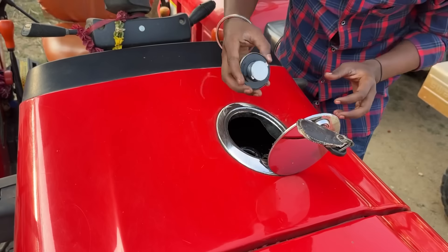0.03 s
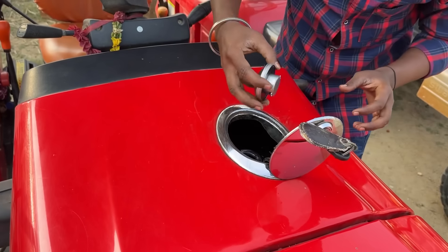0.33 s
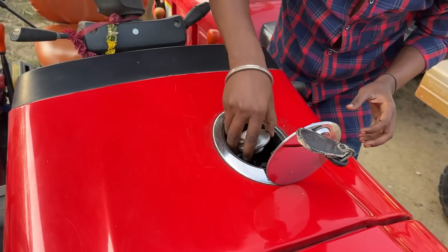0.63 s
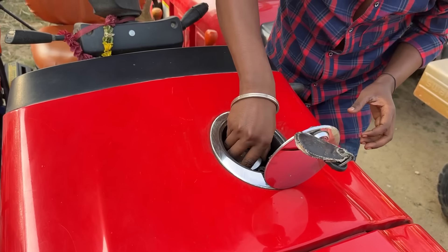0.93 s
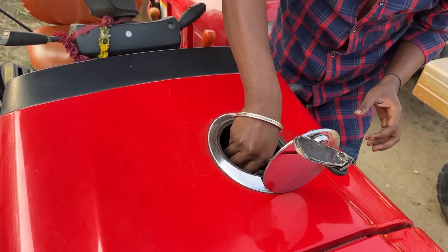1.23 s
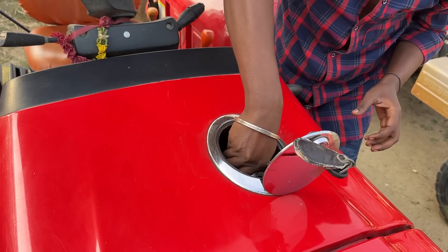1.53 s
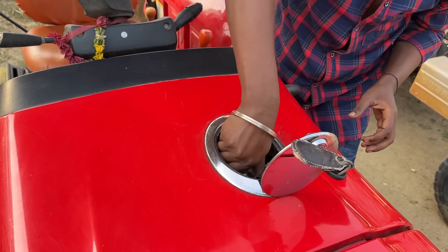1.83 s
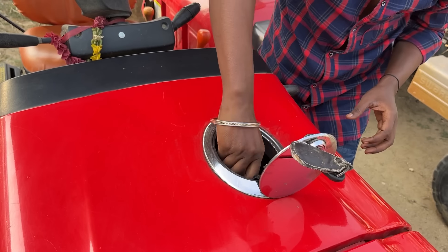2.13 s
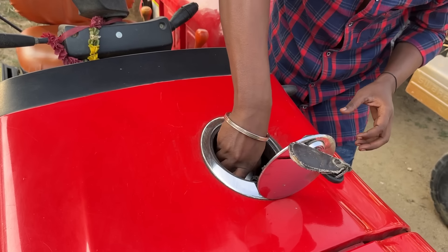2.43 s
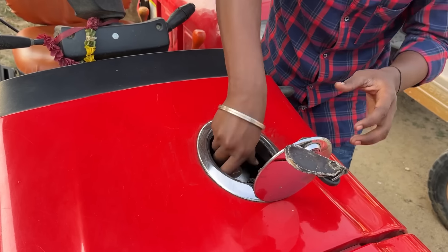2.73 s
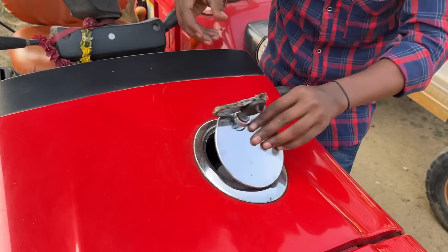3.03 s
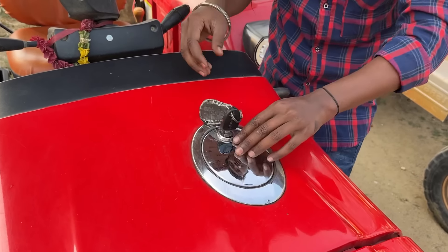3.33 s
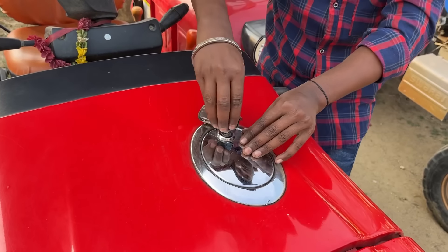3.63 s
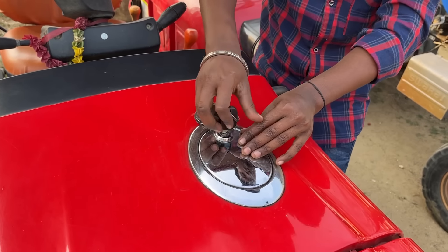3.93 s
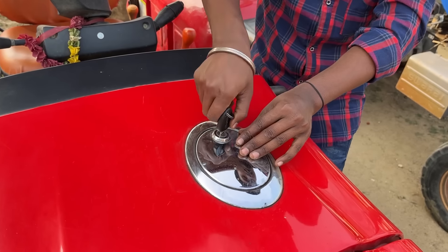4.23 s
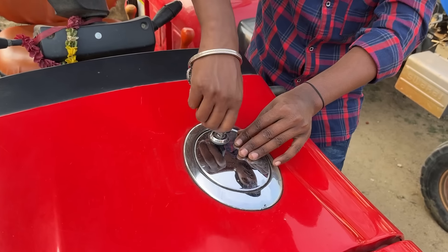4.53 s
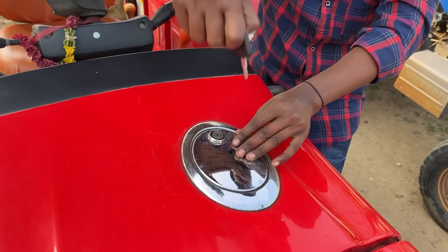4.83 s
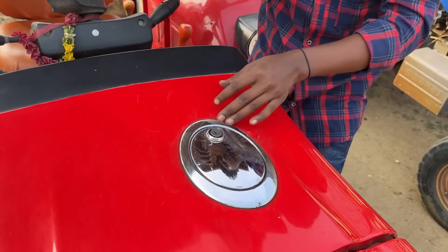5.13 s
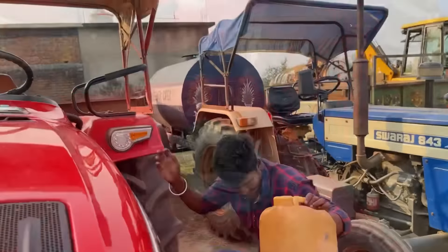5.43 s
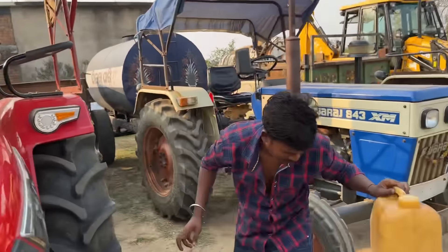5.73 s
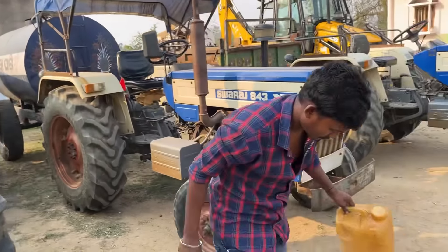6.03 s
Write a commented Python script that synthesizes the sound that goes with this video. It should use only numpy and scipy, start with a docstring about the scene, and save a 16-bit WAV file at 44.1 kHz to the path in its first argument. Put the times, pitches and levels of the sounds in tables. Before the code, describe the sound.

A metal fuel cap knocks and screws into a ringing tank, then a flap slams and a key grates in its lock, with faint birds.

```python
"""A metal fuel cap is knocked into a tractor's filler neck and screwed down, ringing the steel tank.
The chrome flap slams on the sheet-metal bonnet and a key grates in its lock. Shoes scuff on dirt
and a plastic jerrycan clicks as it is carried off. Small birds whistle in the yard, and parked
vehicles return a faint echo over a low rumble."""
import sys
import numpy as np
from scipy import signal
from scipy.fft import rfft, irfft, next_fast_len
from scipy.io import wavfile
from scipy.ndimage import uniform_filter1d

SR = 44100
rng = np.random.default_rng(int(sys.argv[2]) if len(sys.argv) > 2 else 0)


def inscribe(sig):
    """Save sig as 16-bit PCM at rate SR to the path in sys.argv[1].

    A 1-D sig is mono; a 2-D sig holds one channel per row.
    Samples are clipped to [-1, 1] before scaling.
    """
    pcm = np.round(np.clip(np.atleast_2d(sig).T, -1, 1) * 32767)
    wavfile.write(sys.argv[1], SR, pcm.astype(np.int16))


N = 268172
TOP_HZ = 15900
# dense overtones of the bonnet and flap: freq_hz, density_db, t60_s
BONNET_OVERTONES = [(50, -8, 0.2), (110, -4.5, 0.12), (351.6, -7, 0.29), (960, -11.5, 0.22),
                    (2180, -17, 0.088), (5260, -8.5, 0.13), (8500, -17, 0.015), (15000, -22.5, 0.039)]


def undb(db):
    """Decibels to gain."""
    return 10 ** (np.asarray(db) / 20)


def unit(x):
    """Scale to rms 1."""
    return x / np.sqrt(np.mean(x ** 2))


def burst(x, db, window_s=.02):
    """Give a short stereo sound the energy of window_s of steady sound at db."""
    return x * undb(db) / np.sqrt(np.sum(x ** 2) / (2 * window_s * SR))


def seconds(length_s):
    """Time axis."""
    return np.arange(int(length_s * SR)) / SR


def fade(t, t60_s):
    """Exponential decay, 60 dB down at t60_s."""
    return np.exp(-np.log(1000) * t / t60_s)


def add(out, start_s, x):
    """Mix x into out at start_s."""
    i = max(int(start_s * SR), 0)
    out[:, i:i + x.shape[1]] += x[:, :max(N - i, 0)]


def along(hz, table, column=1):
    """Read a column of a table on a log-frequency axis."""
    columns = np.transpose(table)
    return np.interp(np.log(hz + 1), np.log(columns[0]), columns[column])


def shape(x, gain):
    """Filter by a gain that is a function of frequency."""
    size = next_fast_len(x.shape[-1])
    return irfft(rfft(x, size) * gain(np.fft.rfftfreq(size, 1 / SR)), size)[..., :x.shape[-1]]


def equalise(x, curve):
    """Filter by an EQ curve of freq_hz, gain_db points."""
    return shape(x, lambda f: undb(along(f, curve)))


def band(x, low_hz, high_hz, order=3):
    """Causal band-pass."""
    sos = signal.butter(order, [low_hz, min(high_hz, .45 * SR)], "band", fs=SR, output="sos")
    return signal.sosfilt(sos, x)


def resonance(x, hz, width_hz, order=2):
    """One resonant band around hz."""
    low_hz = np.hypot(hz, width_hz / 2) - width_hz / 2
    return band(x, low_hz, low_hz + width_hz, order)


def convolve(x, response):
    """Play x through a stereo impulse response scaled to unit energy."""
    return signal.fftconvolve(x, response / np.sqrt(np.sum(response ** 2) / 2), axes=1)[:, :N]


def noise(count, apart_hz=1100, width=0.86):
    """Stereo noise: alike in the bass, wider above apart_hz."""
    mid, side = rng.standard_normal((2, count))
    side = shape(side, lambda f: 0.24 + width * f / np.hypot(f, apart_hz))
    return np.array([mid + side, mid - side])


def flutter(count, size):
    """Random wobble of spread 1, smoothed over size samples."""
    return unit(uniform_filter1d(rng.standard_normal(SR), size=size))[:count]


def drift(points):
    """Slow wander through random points spread evenly over the scene."""
    return np.interp(np.arange(N), np.linspace(0, N - 1, points), rng.standard_normal(points))


def wash(t, table, width):
    """Noise that dies at its own rate in each octave; alternate signs keep neighbours in phase."""
    hiss, out = noise(len(t), width=width), 0
    for k, hz in enumerate(60 * 2. ** np.arange(9)):
        octave = band(hiss, hz / np.sqrt(2), hz * np.sqrt(2), order=2)
        out += (-1) ** k * octave * undb(along(hz, table)) * fade(t, along(hz, table, column=2))
    return out


def rumble(level_db=-54, swell_db=1.2):
    """A distant low rumble that swells slowly."""
    # bass-heavy spectrum: freq_hz, gain_db
    colour = [(20, -33), (40, -12.5), (62, 2), (110, -2), (170, -6.5), (300, -15.5), (550, -26),
              (1200, -41.5), (3000, -60), (15000, -64)]
    return unit(equalise(noise(N, apart_hz=497), colour)) * undb(level_db + swell_db * drift(30))


def rustle(trim_db=-3.5, grain_db=2.5, flicker_db=1.8):
    """Clothes and dust make a faint, restless, grainy hiss nearby."""
    # rise and fall of the movement: time_s, level_db
    contour = [(0, -75), (.45, -74), (.62, -69.5), (.8, -70), (1.1, -65.5), (1.65, -72.5), (1.95, -73),
               (2.27, -58.5), (2.36, -67.5), (2.45, -60), (2.75, -70), (3.05, -57), (3.2, -47.5),
               (3.4, -72), (4.05, -63.5), (4.48, -69.5), (4.55, -79), (4.665, -70), (4.69, -63),
               (4.87, -64), (5.2, -72), (5.5, -65), (6.08, -60.5)]
    # spectrum of the rustle: freq_hz, gain_db
    colour = [(300, -1), (900, 7), (2000, 4), (4000, -3), (7500, -5.5), (10000, -11), (13500, -8.5)]
    level_db = np.interp(np.arange(N) / SR, *np.transpose(contour)) + flicker_db * drift(160)
    grains = undb(grain_db * unit(uniform_filter1d(rng.standard_normal(N), size=90)))
    return unit(equalise(noise(N, width=.35) * grains, colour)) * undb(level_db + trim_db)


def clicks(rows, partials, width_ratio, t60_s, snap):
    """Small stiff parts: a fast-dying snap of noise through broad resonances."""
    out, t = np.zeros((2, N)), seconds(.15)
    for start_s, level_db, pitch_hz in rows:
        tap = noise(len(t), width=.2) * (fade(t, t60_s) + snap * fade(t, .007))
        click = sum(undb(db) * resonance(tap, ratio * pitch_hz, width_ratio * pitch_hz)
                    for ratio, db in partials)
        add(out, start_s, burst(click, level_db))
    return out


def metal_ticks():
    """Bangle, key and latch give bright, almost pitchless ticks."""
    # light metal contacts: start_s, level_db
    touches = [(0.103, -67), (.504, -56), (0.533, -61.5), (1.155, -51.5), (1.198, -51), (1.375, -51.5),
               (3.608, -78), (4.295, -89), (4.5, -61.5), (4.765, -42.5)]
    rows = [(start_s, level_db, 8700) for start_s, level_db in touches]
    return clicks(rows, partials=[(0.63, 0)], width_ratio=3.5, t60_s=0.042, snap=0.8)


def scuffs(grain_db=5.5, slip_db=2.5):
    """Grit crunches in uneven grains and little slips under a quick swell."""
    # strokes of shoes and sleeves: start_s, length_s, level_db
    strokes = [(0.125, 0.12, -68.5), (0.609, 0.096, -65.5), (2.403, 0.21, -64.5), (2.917, 0.12, -62),
               (3.395, 0.17, -65), (3.865, 0.15, -65.5), (4.854, 0.12, -63.5), (5.305, 0.12, -60),
               (5.445, 0.15, -56), (5.794, 0.22, -59.5), (5.812, 0.067, -48.5)]
    # spectrum of the crunch: freq_hz, gain_db
    colour = [(300, -14), (800, -7), (1600, 1), (3200, -7), (6000, -13), (10000, -30.5), (14000, -24.5)]
    out = np.zeros((2, N))
    for start_s, length_s, level_db in strokes:
        progress = seconds(length_s) / length_s
        count = len(progress)
        roughness = undb(grain_db * flutter(count, size=40) + slip_db * flutter(count, size=500))
        crunch = equalise(noise(SR, width=0.32)[:, :count] * roughness, colour)
        add(out, start_s, undb(level_db) * unit(crunch * np.sin(np.pi * progress ** 0.65)))
    return out


def handling_clicks():
    """Handled parts and the plastic jerrycan click lightly, each tap at its own pitch."""
    # light taps: start_s, level_db, pitch_hz
    taps = [(.153, -58.5, 750), (.633, -57, 2110), (1.023, -56.5, 4200), (2.409, -60.5, 2550),
            (2.501, -54.5, 1730), (2.95, -57, 1660), (2.977, -50, 2350), (2.997, -58.5, 4300),
            (3.071, -47, 2340), (3.479, -56, 1550), (3.5657, -58.5, 2480), (3.913, -52.5, 1540),
            (3.9826, -59.5, 1600), (4.063, -63, 2200), (5.327, -65, 2990), (5.471, -64, 1940),
            (5.5362, -47, 3210), (5.638, -61.5, 3400), (5.802, -57, 1900), (5.825, -55.5, 4340),
            (5.8495, -48.5, 1820), (6.038, -49.5, 2790), (6.056, -57, 2200)]
    # resonances of a tapped part: pitch_ratio, gain_db
    partials = [(0.999, 7), (2.2, -12)]
    return clicks(taps, partials, width_ratio=0.28, t60_s=0.05, snap=2.4)


def add_bird_call(out, start_s, pitch_hz, envelope, waver, tremble_db=3):
    """Mix in one wavering, trembling tone and its slap echoes."""
    # reflections off hard walls: delay_s, gain_db
    walls = [(0.042, -15), (0.088, -15)]
    count = len(pitch_hz)
    tone = np.sin(2 * np.pi * np.cumsum(pitch_hz * (1 + waver * flutter(count, size=70))) / SR)
    call = np.tile(envelope * undb(tremble_db * flutter(count, size=400)) * tone, (2, 1))
    add(out, start_s, call)
    for delay_s, gain_db in walls:
        add(out, start_s + delay_s, undb(gain_db) * call)


def bird_whistles(slide_s=0.0155):
    """Short whistles slide onto a note, most of them from above."""
    # whistled notes: start_s, length_s, pitch_hz, level_db, bend_ratio (starting offset from the note)
    notes = [(0.346, 0.033, 3350, -61.5, 0.077), (0.389, 0.039, 4480, -71.5, 0.081),
             (0.456, 0.059, 2430, -51.5, 0.13), (0.51, 0.044, 3150, -47.5, 0.14),
             (0.665, 0.068, 2860, -51.5, -0.21), (0.69, 0.12, 2575, -54.5, 0.047),
             (0.695, 0.1, 2310, -60, 0.2), (0.834, 0.061, 2534, -48, 0.17),
             (0.862, 0.062, 2640, -55, -0.051)]
    out = np.zeros((2, N))
    for start_s, length_s, pitch_hz, level_db, bend_ratio in notes:
        t = seconds(length_s)
        glide_hz = pitch_hz * (1 + bend_ratio * np.exp(-t / slide_s))
        envelope = undb(level_db) * np.sin(np.pi * (t / length_s) ** 0.81)
        add_bird_call(out, start_s, glide_hz, envelope, waver=0.017)
    return out


def ring(t, modes, build_s):
    """Panel modes, a little different at each blow: low ones build slowest, high ones spread widest."""
    out = 0
    for k, (hz, db, t60_s) in enumerate(modes):
        accent, detune, lag = rng.standard_normal(3)
        spread = lag * min(hz / 2200, .6) * np.array([[1], [-1]])
        tone = np.sin(2 * np.pi * hz * (1 + .002 * detune) * t + spread)
        attack = 1 - np.exp(-t * np.sqrt(hz / 200) / build_s)
        out += (-1) ** k * undb(db + 1.2 * accent) * tone * fade(t, t60_s) * attack
    return out


def knocks(blows, modes, overtones, registers_db, heft, wash_db, crack_db, build_s, grit):
    """Steel on steel: edges chatter while in contact, then the panel rings."""
    out, t = np.zeros((2, N)), seconds(.8)
    edges_hz = (45, 280, 850, 2400, 7000, TOP_HZ)  # registers: thump, body, clank, clack, tick
    strongest_db = max(blow[1] for blow in blows)
    for start_s, level_db, tilt_db, contact_s, favoured_hz in blows:
        # brightness tilts the registers around the body, by tilt_db per register
        levels_db = level_db + np.array(registers_db) + tilt_db * (np.arange(5) - 1)
        levels_db[0] -= heft * (strongest_db - level_db)  # lighter blows lose thump
        chatter = np.exp(grit * flutter(len(t), size=30))
        contact = (1 - np.exp(-t / (.15 * contact_s))) / (1 + (t / contact_s) ** 6)
        crack = burst(noise(len(t), width=.2) * chatter * contact, crack_db)
        shimmer = burst(wash(t, overtones, width=.3), wash_db)
        steel = burst(ring(t, modes, build_s), 0) + shimmer
        hit = steel * (1 - np.exp(-4 * t / contact_s)) + crack
        knock = sum(burst(band(hit, lo, hi), db) for lo, hi, db in zip(edges_hz, edges_hz[1:], levels_db))
        # the struck spot favours the modes near one pitch
        hollow = undb(6) * resonance(knock, favoured_hz, .3 * favoured_hz, order=1)
        add(out, start_s, unit(knock + hollow) * np.std(knock) * undb(2.5))
    return out


def cap_knocks():
    """The cap knocks in the filler neck and sets the tank ringing."""
    # knocks of the cap: start_s, level_db, tilt_db, contact_s, favoured_hz
    blows = [(0.853, -36, -0.5, 0.0069, 183), (0.868, -40, -4, 0.0037, 485), (1.008, -57.5, 8, 0.0019, 730),
             (1.022, -45, -5, 0.048, 780), (1.1415, -37.5, -1.5, 0.00099, 454),
             (1.154, -26, -0.4, 0.026, 424), (1.199, -25.5, -0.5, 0.00082, 624),
             (1.375, -32.5, 0, 0.0039, 540), (1.41, -39.5, -2, 0.058, 135), (1.468, -53, 0.5, .01, 330),
             (1.603, -47, -4.5, 0.0083, 385), (1.629, -46, -3, 0.0026, 137),
             (1.647, -51, -0.5, 0.0053, 336), (1.675, -48.5, -1, 0.034, 464), (1.734, -53, -5, .01, 152),
             (1.804, -57.5, -1, 0.0019, 430), (1.82, -51, -5.5, 0.0037, 173), (2.0535, -24, 5, 0.0013, 617),
             (2.064, -39.5, -4, 0.0053, 236), (2.192, -47.5, 3, 0.0094, 423),
             (2.408, -52.5, 3.5, 0.0057, 343)]
    # modes of the tank and neck: pitch_hz, level_db, t60_s
    modes = [(118.6, -4.5, 0.24), (137.2, 0.5, 0.098), (171.7, -5, 0.21), (214, -3, 0.2),
             (241, -12.5, 0.19), (315.3, -0.5, 0.33), (362.2, 3, 0.216), (389.2, 3, 0.27),
             (418, -6.5, 0.61), (451, 7, 0.14), (541, 1.5, 0.18), (577, -4.5, 0.29), (639.6, 6.5, 0.12),
             (732, -8.5, 0.32), (752, -14, 0.39), (804, -9.5, 0.18), (875, -6.5, 0.185), (1088, -15, 0.16),
             (1157, -5.5, 0.088), (1258, -15.5, 0.32), (1357, -11.5, 0.21), (1583, -9, 0.1),
             (1874, -8, 0.11), (2200, -14, 0.13), (2787, -6.5, 0.082), (3620, -5.5, 0.059),
             (4780, -6.5, 0.11)]
    # dense overtones of the tank: freq_hz, density_db, t60_s
    overtones = [(51.3, -27, 0.086), (113.3, -12, 1), (590, -0.5, 0.15), (1220, -7.5, 0.2),
                 (2340, -22.5, 0.2), (4632, -7, 0.092), (7700, -19, 0.1), (15000, -36, 0.06)]
    return knocks(blows, modes, overtones, registers_db=(-3, -3, -8, -15, -29),
                  heft=0.057, wash_db=-7.5, crack_db=-13.5, build_s=.0012, grit=0.25)


def cap_thread(start_s=0.96, length_s=1, level_db=-63.5, grain_db=3, slip_db=6):
    """The cap's thread sticks and slips through one turn of the wrist."""
    out, progress = np.zeros((2, N)), seconds(length_s) / length_s
    count = len(progress)
    friction = noise(count)
    friction *= undb(grain_db * flutter(count, size=60) + slip_db * flutter(count, size=1500))
    rub = resonance(friction, hz=850, width_hz=1000) * np.sqrt(np.sin(np.pi * progress))
    add(out, start_s, undb(level_db) * unit(rub))
    return out


def bird_squeaks():
    """Thin calls lead in softly, climb and flick up, each at its own pace."""
    # rising calls: time_s, level_db
    calls = [(0.988, -54.5), (1.255, -55.5), (3.94, -57), (4.799, -53.5), (5.103, -55.5)]
    # contour of one call: offset_s, pitch_hz, gain_db
    contour = [(-.04, 5850, -30), (-.025, 5750, -11), (-.004, 5650, -15), (0, 5050, -19), (.012, 5580, 0),
               (.04, 6000, 0), (.065, 6550, -4), (.08, 7400, -11), (.092, 8200, -22)]
    offsets_s, pitches_hz, gains_db = np.transpose(contour)
    out = np.zeros((2, N))
    for (time_s, level_db), (stretch, detune) in zip(calls, rng.standard_normal((len(calls), 2))):
        times = offsets_s * (1 + .04 * stretch)
        t = times[0] + seconds(times[-1] - times[0])
        glide_hz = np.interp(t, times, pitches_hz) * (1 + .008 * detune)
        envelope = undb(level_db + np.interp(t, times, gains_db))
        add_bird_call(out, time_s + times[0], glide_hz, envelope, waver=0.014)
    return out


def scrapes(strokes, modes, catches_per_s, grit_db=5):
    """Metal dragged over metal catches at uneven moments, each a tiny snap into narrow resonances."""
    out, t = np.zeros((2, N)), seconds(.25)
    for start_s, length_s, level_db in strokes:
        catches = rng.random(SR)[:len(t)] < catches_per_s / SR
        sizes = undb(grit_db * rng.standard_normal(len(t)))
        snaps = signal.fftconvolve(catches * sizes, fade(t, t60_s=0.0025))[:len(t)]
        friction = noise(len(t), width=.4) * (snaps + .3) / (1 + (t / length_s) ** 8)
        scrape = sum(undb(db) * resonance(friction, hz, width_hz, order=1) for hz, width_hz, db in modes)
        add(out, start_s, burst(scrape, level_db))
    return out


def rim_scrapes():
    """The cap's rim drags in the neck."""
    # drags of the rim: start_s, length_s, level_db
    strokes = [(1.55, 0.049, -58), (1.605, 0.033, -58.5), (1.67, 0.065, -59.5)]
    # resonances of the rim: pitch_hz, width_hz, gain_db
    modes = [(870, 100, 8), (1320, 80, 6.5), (1560, 150, 3), (2100, 340, -6), (3320, 710, -34)]
    return scrapes(strokes, modes, catches_per_s=200)


def flap_slam():
    """The flap is lifted and slammed, and the sheet-metal bonnet rings."""
    # hits of the flap: start_s, level_db, tilt_db, contact_s, favoured_hz
    blows = [(2.885, -43, -3, 0.0007, 820), (3.092, -34, -5.5, 0.005, 318),
             (3.118, -28.5, -1.5, 0.00077, 1280), (3.1212, -18, 0.68, 0.004, 2150),
             (3.134, -22, 0.5, 0.004, 118), (3.142, -31, -5, 0.003, 105)]
    # modes of the bonnet with the flap: pitch_hz, level_db, t60_s
    modes = [(90, -1, 0.09), (123, 5, 0.047), (144.4, -4, 0.2), (157.4, -29, 2.3), (228.5, -12, 0.3),
             (201, -6, 0.24), (334, 2.5, 0.26), (358, -3, 0.12), (403.8, 2.5, 0.16), (448, -7.5, 0.31),
             (530.5, -11.5, 0.14), (643, -2.5, 0.084), (702, -10.5, 0.24), (858, -7.5, 0.15),
             (906, -3.5, 0.064), (1182, -4, 0.11), (1293, 2, 0.14), (1717, -13, 0.098), (2245, -11, 0.071),
             (2340, -8.5, 0.025), (2510, -6.5, 0.043), (2940, -3.5, 0.07), (4662, -4.5, 0.08),
             (5180, -5.5, .05), (5180, 0, 0.08)]
    return knocks(blows, modes, BONNET_OVERTONES, registers_db=(-0.5, -0.5, -7, -7, -9.5),
                  heft=0.85, wash_db=0, crack_db=0, build_s=0.0017, grit=0.077)


def lock_clunks():
    """A palm settles on the shut flap and the key turns the lock."""
    # knocks of palm and key: start_s, level_db, tilt_db, contact_s, favoured_hz
    blows = [(3.23, -46, 0.5, .004, 135), (3.532, -48.5, 3.5, 0.0067, 1900), (3.607, -45, 3.5, 0.0034, 669),
             (3.739, -42.5, 3.5, 0.0061, 790), (3.912, -49, -4, 0.0021, 150),
             (3.985, -49, 0.5, 0.0091, 332), (4.018, -46.5, -3.5, 0.0014, 146.7),
             (4.2955, -41.5, 2.5, 0.0013, 1500), (4.428, -47, 0, 0.023, 430),
             (4.503, -47.5, 0.5, 0.01, 370), (4.539, -55, -3, .003, 600), (4.68, -54.5, 1, 0.0069, 1280),
             (4.7455, -39.5, 3.5, 0.0046, 1090), (4.75, -35.5, 1, 0.013, 2150),
             (4.76, -40, -2.5, 0.0011, 170)]
    # modes of the flap, damped under the palm: pitch_hz, level_db, t60_s
    modes = [(114.2, 7.5, 0.16), (168, -6, 0.27), (202, 9.5, 0.079), (234.2, -5, 0.23), (262.4, -9.5, 0.41),
             (331.5, 3, 0.14), (398.3, -5, 0.21), (450, -6, 0.3), (598, -2, 0.22), (796, -15, 0.47),
             (852, 0, 0.14), (1101, -2, 0.13), (1167, -6.5, 0.25), (2010, 1, 0.082), (2240, 0, 0.041),
             (2644, -5, 0.11), (2700, -24, 0.27), (5050, 11, 0.03)]
    return knocks(blows, modes, BONNET_OVERTONES, registers_db=(4, -4.5, -14.5, -16.5, -30.5),
                  heft=0.49, wash_db=-1, crack_db=2.5, build_s=0.0024, grit=0.09)


def key_scrapes():
    """The key grates in the lock."""
    # strokes of the key: start_s, length_s, level_db
    strokes = [(4.175, 0.068, -63), (4.362, 0.082, -49), (4.427, 0.036, -54), (4.482, 0.048, -56.5),
               (4.885, 0.062, -68)]
    # resonances of the key: pitch_hz, width_hz, gain_db
    modes = [(1120, 250, 18), (1480, 130, 8), (1980, 77, 7), (2750, 250, -6), (4040, 980, -14),
             (5540, 250, -16)]
    return scrapes(strokes, modes, catches_per_s=310)


def scatter(x, t60_s=0.072, wet_db=-5):
    """Distant sound arrives along many nearly equal paths, which smears it."""
    t = seconds(0.11)
    return x + undb(wet_db) * convolve(x, noise(len(t)) * fade(t, t60_s))


def yard_echo(x, build_s=0.012):
    """Diffuse echo from the parked vehicles and walls."""
    # echo tail: freq_hz, density_db, t60_s
    tail = [(79.4, 0.5, 0.91), (400.7, 5, 1), (1400, -7, 0.78), (3950, 3.5, 0.37), (8300, 2, 0.45),
            (15000, -12.5, 0.34)]
    t = seconds(1)
    return convolve(x, wash(t, tail, width=0.67) * (1 - np.exp(-(t / build_s) ** 2)))


def scene(bird_db=-4, near_send_db=-26, bird_send_db=-13):
    """Metalwork, handling and footwork all slightly left, distant birds, in an open yard."""
    metalwork = cap_knocks() + cap_thread() + flap_slam() + lock_clunks() + metal_ticks()
    movement = handling_clicks() + scuffs()
    grating = key_scrapes() + rim_scrapes()
    near = (metalwork + grating) * undb([[0.5], [-0.5]]) + movement * undb([[0.3], [-0.3]])
    birds = undb(bird_db) * scatter(bird_squeaks() + bird_whistles())
    echo = yard_echo(undb(near_send_db) * near + undb(bird_send_db) * birds)
    return near + birds + echo + rumble() + rustle()


def record(dry):
    """A phone's microphone colours the treble, rounds the loudest peak and cuts the top."""
    # treble response of the microphone: freq_hz, gain_db
    response = [(7000, 0.5), (8300, 6.5), (10000, -5.5), (11300, 2), (12800, 1.5), (16000, -4)]
    # a bonnet reflection widens the sound near 1750 Hz; the phone's two ports shift the treble
    # left-right phase: freq_hz, lead_rad
    phase = [(1300, 0), (1750, 1), (2300, 0), (3900, .7), (5900, .3), (7000, -.8), (8000, -1.2),
             (9300, -2.7), (11000, -3.4), (12200, -4.7), (13600, -6.28)]
    sides = np.array([[.5], [-.5]])
    heard = shape(dry, lambda f: undb(along(f, response)) * np.exp(1j * sides * along(f, phase)))
    low_pass = signal.ellip(8, .2, 70, TOP_HZ, fs=SR, output="sos")
    return signal.sosfilt(low_pass, np.tanh(heard))


dry = scene()
out = record(dry)
inscribe(out)
```